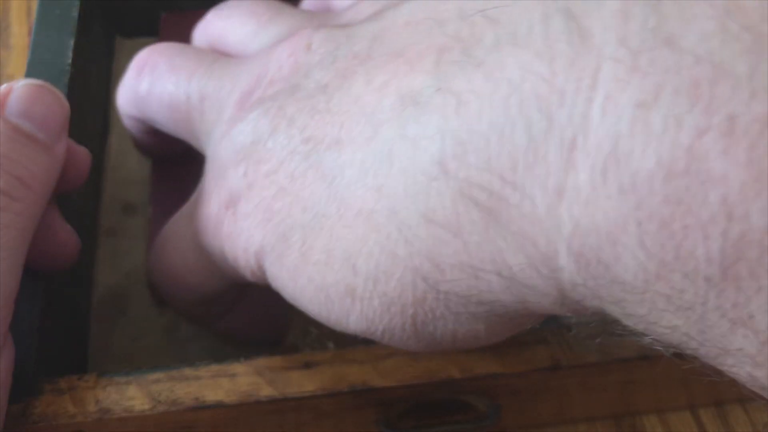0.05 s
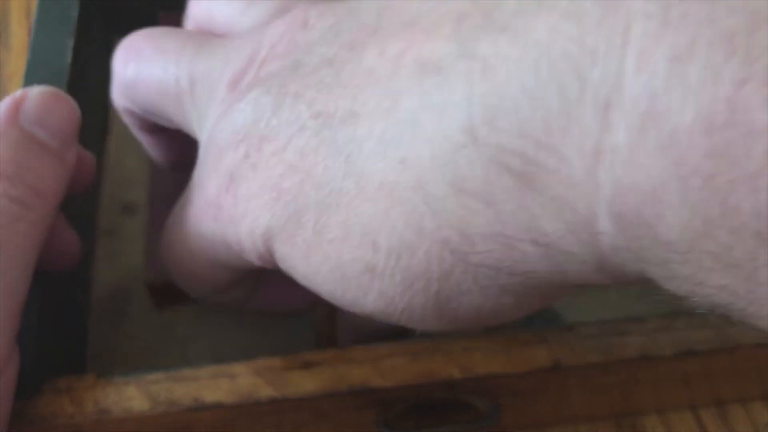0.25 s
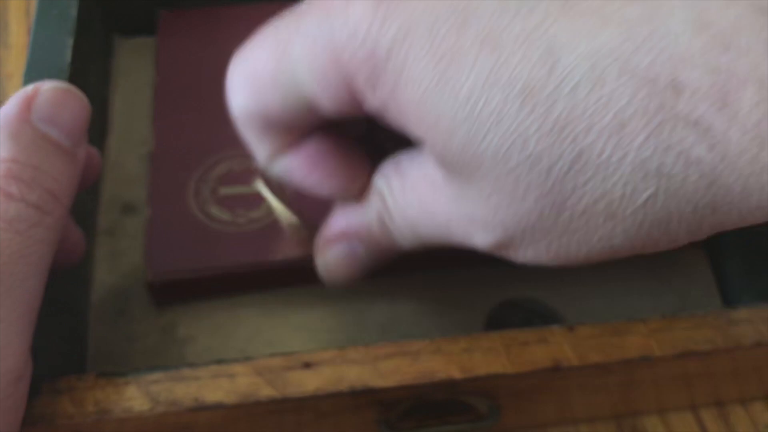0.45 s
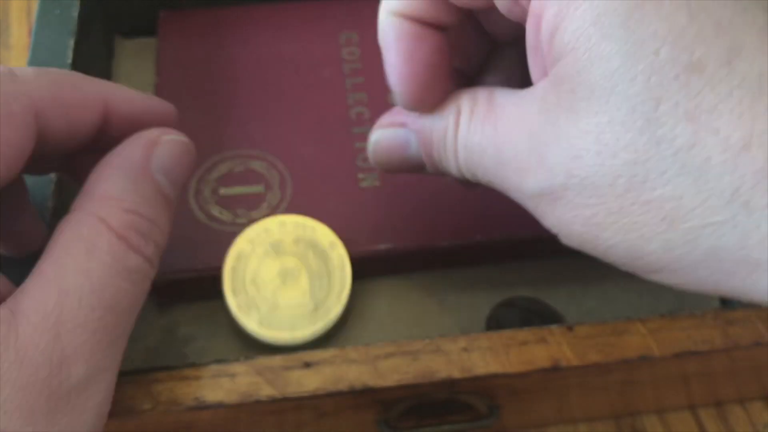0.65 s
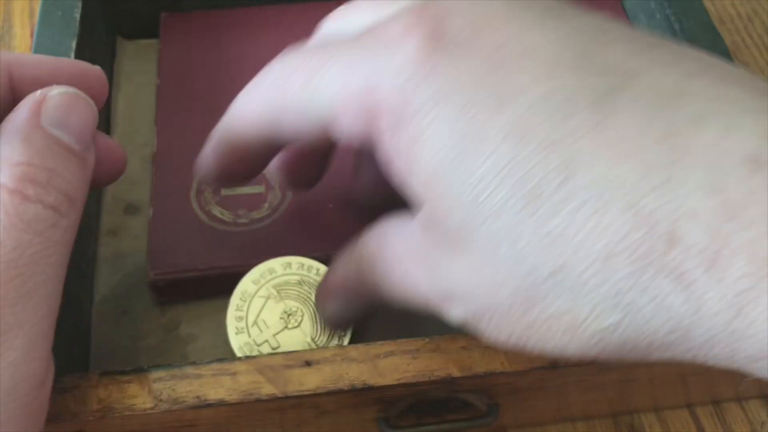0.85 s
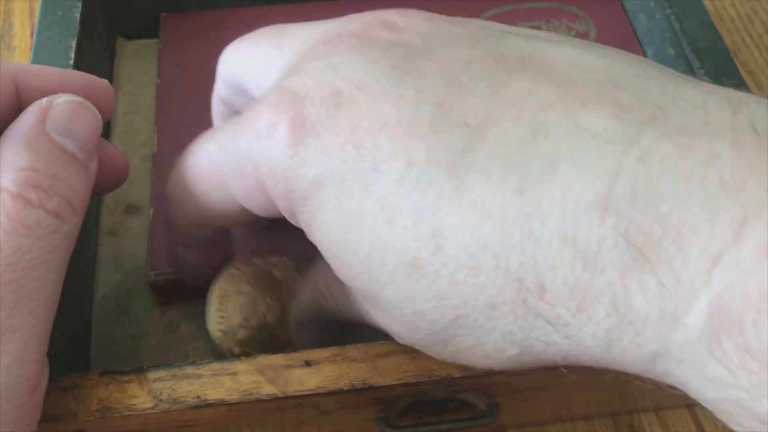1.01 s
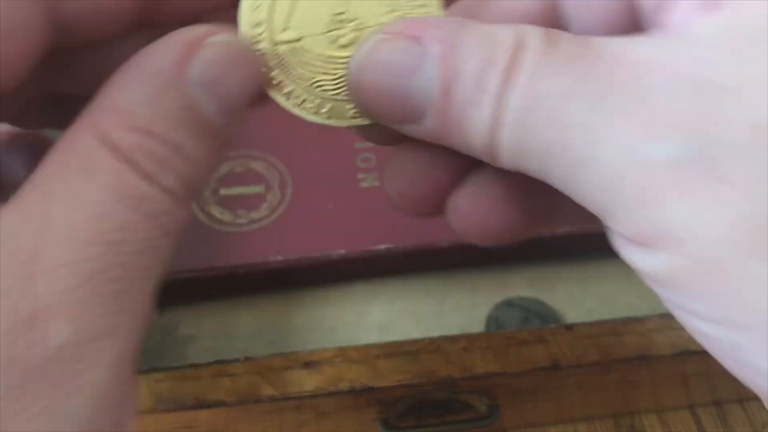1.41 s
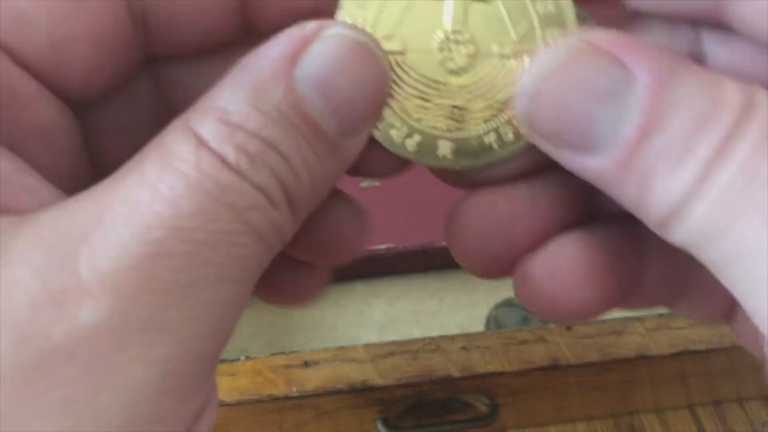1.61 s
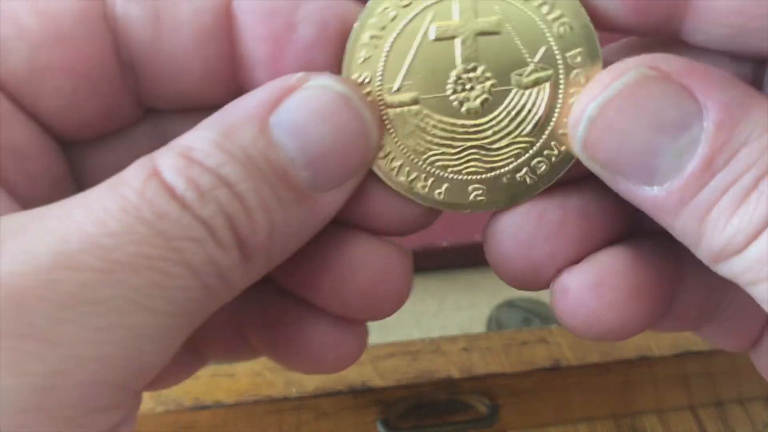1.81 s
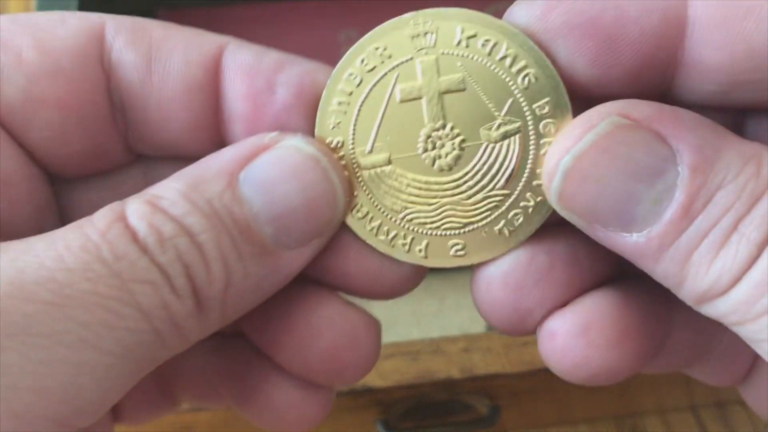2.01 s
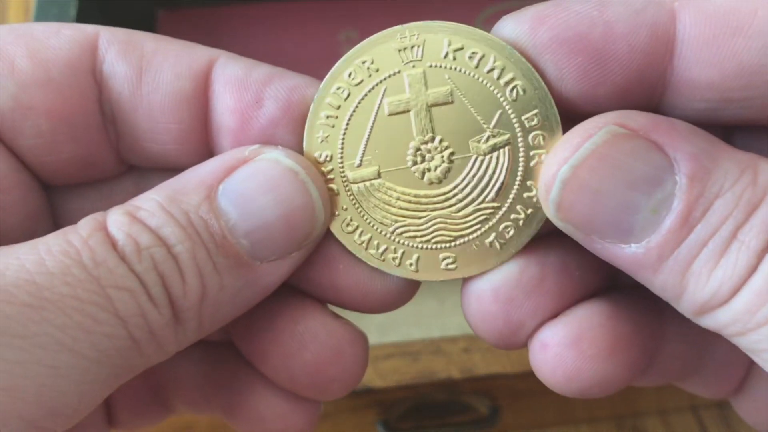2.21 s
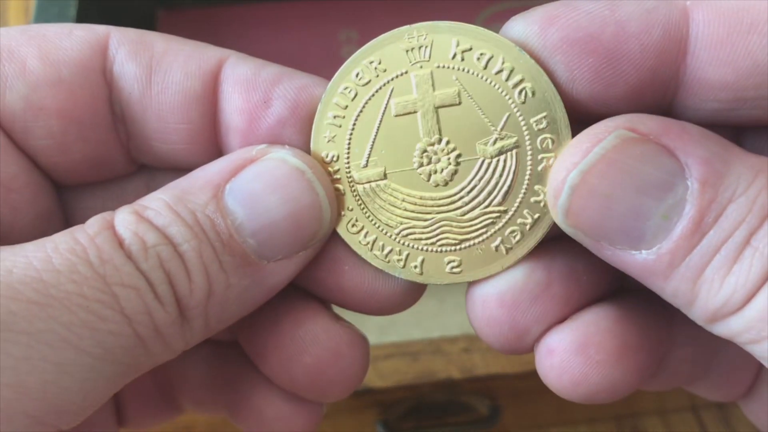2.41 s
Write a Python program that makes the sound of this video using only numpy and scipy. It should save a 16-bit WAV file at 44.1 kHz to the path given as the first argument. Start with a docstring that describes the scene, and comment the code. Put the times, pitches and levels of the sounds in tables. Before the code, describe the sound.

A large metal coin clatters in a wooden drawer. Fingers rub over card and a flat box bumps, then the coin skips, lands with a short ring and is scraped up. Heard close in a small, faintly humming room.

```python
"""Fingers fish for a large coin in a wooden drawer, in a small, fairly live room with a faint hum.
Skin rubs over card, then a flat box bumps against the wood and sets the drawer shaking.
The coin slips, skips over the box in a run of knocks and lands ringing, until the wood smothers it.
It is scraped up again and, last and very quietly, turned in the fingers."""
import sys
import numpy as np
from scipy import signal
from scipy.fft import rfft, irfft
from scipy.io import wavfile
from scipy.ndimage import uniform_filter1d

SR = 44100
rng = np.random.default_rng(int(sys.argv[2]) if len(sys.argv) > 2 else 0)


def store_wav(level_fs):
    """Save 16-bit WAV to argv[1]."""
    pcm = np.round(np.clip(np.atleast_2d(level_fs), -1, 1) * 32767)
    wavfile.write(sys.argv[1], SR, pcm.T.astype(np.int16))


N = 112454


def amp(db):
    """Decibels to gain."""
    return 10 ** (np.asarray(db) / 20)


def unit(x):
    """Scales to rms 1."""
    return x / np.sqrt(np.mean(x ** 2) + 1e-20)


def curve_at(points, hz):
    """Reads a curve on a log-frequency axis."""
    points_hz, values = np.transpose(points)
    return np.interp(np.log(hz + 1), np.log(points_hz + 1), values)


def add(mix, start_s, sound):
    """Drops a sound into the mix at its cue."""
    part = mix[max(round(start_s * SR), 0):][:len(sound)]
    part += sound[:len(part)]


def coloured(x, eq):
    """Shapes a steady signal with an EQ curve, at rms 1."""
    gains = amp(curve_at(eq, np.fft.rfftfreq(len(x), 1 / SR)))
    return unit(irfft(rfft(x) * gains, len(x)))


def wander(samples):
    """Smooth random modulation at rms 1; more samples make it slower."""
    return unit(uniform_filter1d(uniform_filter1d(rng.standard_normal(N), samples), samples))


def swells(strokes):
    """A bell-shaped fade in and out for each stroke."""
    t = np.arange(N) / SR
    return sum(amp(db) * np.exp(-((t - peak_s) / width_s) ** 2 / 2) for peak_s, width_s, db in strokes)


def friction(eq, spread_db, slips_per_s=2500):
    """Dense tiny slips of uneven size; more spread gives more grit."""
    boost_db = spread_db * np.minimum(rng.exponential(1, N), 4)
    sizes = amp(boost_db) * rng.standard_normal(N)
    return coloured(sizes * (rng.random(N) < slips_per_s / SR), eq)


# reverb time of the room: freq_hz, t60_s
ROOM_DECAY = [(100, 0.99), (400, 0.72), (900, 0.446), (2000, 0.47), (5000, 0.37), (9000, 0.38),
              (15000, .38)]

def room(x, wet_db, build_s=0.002):
    """Direct sound plus a diffuse tail, new for each place that sounds."""
    size = 32768
    hz, t, noise = signal.stft(rng.standard_normal(size), SR, nperseg=256)
    decay = amp(-60 * t / curve_at(ROOM_DECAY, hz)[:, None])
    tail = signal.istft(noise * decay, SR, nperseg=256)[1][:size]
    tail *= 1 - np.exp(-np.arange(size) / SR / build_s)
    response = amp(wet_db) * tail / np.linalg.norm(tail)
    response[0] += 1
    return signal.fftconvolve(x, response)[:N]


# tone of the room air: freq_hz, gain_db
AIR_EQ = [(5, 17), (11, 25.5), (20, 17.5), (35, -9.5), (60, -6.5), (140, -14), (300, -13), (500, -15.5),
          (1000, -23.5), (2000, -33), (4000, -39.5), (9000, -42.5), (16000, -48.5)]
# partials of the hum: pitch_hz, rms_db
HUM_PARTIALS = [(177.6, -68), (236.9, -76), (312.2, -73.5), (355.3, -75.5)]

def room_tone(air_db=-48):
    """The bed: room air, deep rumble and a slightly wavering hum."""
    t = np.arange(N) / SR
    bed = amp(air_db) * coloured(rng.standard_normal(N), AIR_EQ)
    for hz, db in HUM_PARTIALS:
        waver = 0.33 * wander(samples=6000)
        bed += amp(db) * np.sqrt(2) * np.sin(2 * np.pi * (hz * t + rng.random()) + waver)
    return bed


# low modes of the furniture: pitch_hz, level_db, attack_s, hold_until_s, t60_s
SHAKE_MODES = [(22.3, -28.5, 0.014, 0.18, 0.5), (39, -46, 0.016, 0.15, 0.16), (55.65, -35, .03, 0.12, 0.45),
               (82.66, -27.5, 0.023, 0.023, .15), (103.1, -35, 0.025, 0.029, 0.13),
               (267.5, -48, 0.035, 0.0394, 0.49)]

def drawer_shake(start_s=0.229):
    """The low end: the bumped furniture sways and booms for a moment."""
    boom, t = np.zeros(N), np.maximum(np.arange(N) / SR - start_s, 0)
    for hz, db, attack_s, hold_until_s, t60_s in SHAKE_MODES:
        envelope = np.minimum(t / attack_s, 1) * amp(db - 60 * np.maximum(t - hold_until_s, 0) / t60_s)
        boom += envelope * np.sin(2 * np.pi * hz * t)
    return boom


# finger strokes: peak_s, half_width_s, level_db
SKIN_RUBS = [(0.067, 0.39, -65), (1.514, 0.084, -78), (1.68, 0.046, -79.5), (2.17, 0.024, -99)]
RIM_DRAGS = [(2.155, .022, -78)]
HAND_PUSHES = [(0.20, 0.025, -45.5), (0.32, 0.042, -48), (0.76, 0.051, -50), (1.11, 0.062, -57.5)]
# tone of each kind of stroke: freq_hz, gain_db
RUB_EQ = [(100, 2.5), (900, 7), (1700, 4), (3000, -4), (5100, 0.5), (6500, -3.5), (9500, -3.5),
          (12000, -12.5), (16000, -16)]
DRAG_EQ = [(100, -16), (2100, -24), (2700, 9), (3300, -3), (4200, -30), (16000, -30)]
PUSH_EQ = [(20, 2.5), (55, -3), (90, 3.5), (150, -20.5), (250, -8.5), (400, -12.5), (700, -25), (2000, -49),
           (16000, -75.5)]

def fingers():
    """Skin slides over card and metal and drags on the coin's rim; the hand pushes dully on the wood."""
    rubs = swells(SKIN_RUBS) * friction(RUB_EQ, spread_db=3)
    drags = swells(RIM_DRAGS) * friction(DRAG_EQ, spread_db=5)
    skin = room(rubs + drags, wet_db=-2.5)
    return skin + swells(HAND_PUSHES) * coloured(rng.standard_normal(N), PUSH_EQ)


def ring(modes, t):
    """Struck modes ring out as dying sines."""
    return sum(amp(db - 60 * t / t60_s) * np.sin(2 * np.pi * hz * t) for hz, db, t60_s in modes)


# tone of the bright tick on each hit: freq_hz, gain_db
TICK_EQ = [(100, -25.5), (2000, -10.5), (4000, 8), (6200, 7.5), (8000, 0), (9300, 2), (11000, -8.5),
           (14000, -3), (16000, -15.5)]

def impacts(hits, modes, clack_eq, body_attack_s, snap_s, body_wet_db, clack_wet_db, tick_wet_db):
    """Three layers to a hit: the ringing body, and a clack and a bright tick from the contact."""
    bodies, clacks, ticks = np.zeros((3, N))
    t = np.arange(8192) / SR
    body = ring(modes, t) * (1 - np.exp(-t / body_attack_s))
    for start_s, body_db, clack_db, tick_db, contact_decay_s in hits:
        clack_noise, tick_noise = rng.standard_normal((2, len(t)))
        contact = 2 * np.exp(-t / contact_decay_s) * (1 - np.exp(-t / snap_s))
        add(bodies, start_s, amp(body_db) * body)
        add(clacks, start_s, amp(clack_db) * contact * coloured(clack_noise, clack_eq))
        add(ticks, start_s, amp(tick_db) * contact * coloured(tick_noise, TICK_EQ))
    return room(bodies, body_wet_db) + room(clacks, clack_wet_db) + room(ticks, tick_wet_db)


# box hits: start_s, body_db, clack_db, tick_db, contact_decay_s
BOX_HITS = [(0.187, -48.5, -57.5, -64, .005), (0.195, -47, -52, -61.5, 0.0074),
            (0.224, -29, -38, -68, 0.006), (0.229, -24, -33.5, -45.5, 0.0059),
            (0.234, -47.5, -29, -45.5, 0.0045), (0.246, -42.5, -36.5, -57, 0.0026),
            (0.259, -37.5, -36.5, -67.5, .003), (0.274, -38, -34.5, -55.5, 0.002),
            (0.283, -37, -27.5, -50.5, 0.0036), (0.296, -44, -43.5, -56, 0.0048)]
# resonances of the box: pitch_hz, gain_db, t60_s
BOX_MODES = [(535, -9, .07), (684, -13, .07), (840, -16, .05), (960, -7, .03), (1037, 0, .05),
             (1366, -1, .055), (1580, -9, .04), (1787, -7, .06), (2000, -9, .04), (2227, -7, .05),
             (2300, -10, .05), (3420, -13, .03)]
# tone of its clack: freq_hz, gain_db
BOX_CLACK_EQ = [(100, -24), (250, -8), (450, -11), (900, 1), (1600, 0.5), (2150, 1), (2650, -9), (3400, -6),
                (4600, -19.5), (7000, -32), (16000, -45.5)]

def box_bumps():
    """The flat box clatters against the drawer, each bump ringing its short, hollow modes."""
    return impacts(BOX_HITS, BOX_MODES, BOX_CLACK_EQ, body_attack_s=0.0025, snap_s=0.0011,
                   body_wet_db=-13.5, clack_wet_db=-1.5, tick_wet_db=-3)


# scraping strokes: peak_s, rise_s, fall_s, level_db, metal_send_db
SCRAPE_STROKES = [(0.404, 0.018, 0.0073, -53.5, -24), (1.035, 0.017, 0.022, -74.5, -6),
                  (1.094, 0.016, 0.0071, -65.5, -8), (1.167, 0.012, 0.01, -60, -12)]
# tone of the scrape: freq_hz, gain_db
SCRAPE_EQ = [(100, -19), (900, 1.5), (2000, -0.5), (4200, -9.5), (5800, 2), (7300, -7), (9200, -5),
             (10800, -12), (14000, -13), (16000, -26)]
# resonances of the held coin: pitch_hz, gain_db, t60_s
HELD_COIN_MODES = [(5340, 0.5, 0.056), (9000, 0, 0.034), (12100, 7, .07)]

def coin_scrapes():
    """The rim drags over the drawer floor; the slips make the held coin ring faintly."""
    scrapes, t = np.zeros(N), np.arange(N) / SR
    slips = friction(SCRAPE_EQ, spread_db=4)
    metal = unit(signal.fftconvolve(slips, ring(HELD_COIN_MODES, t[:SR // 10]))[:N])
    for peak_s, rise_s, fall_s, db, metal_send_db in SCRAPE_STROKES:
        width_s = np.where(t < peak_s, rise_s, fall_s)
        scrapes += swells([(peak_s, width_s, db)]) * (slips + amp(metal_send_db) * metal)
    return room(scrapes, wet_db=1.5)


# coin hits: start_s, body_db, clack_db, tick_db, contact_decay_s
COIN_HITS = [(0.409, -27, -46.5, -82, 0.0032), (0.444, -32, -50, -66, 0.001),
             (0.495, -31, -46, -56, 0.0024), (0.563, -32, -48, -58, 0.0031), (0.587, -33, -31, -45, 0.0027),
             (0.597, -46.5, -37.5, -70, 0.0022), (0.636, -33, -42.5, -59, 0.0024),
             (0.693, -41.5, -45, -52, .004), (0.699, -19, -35, -44.5, 0.0019),
             (0.737, -35, -47, -71, 0.0076), (1.094, -52, -67, -80, .006), (1.175, -47, -62.5, -64, 0.0055),
             (1.583, -81, -67.5, -81, .002), (1.668, -79.5, -72, -81, .002), (1.968, -81, -72, -69, 0.0025)]
# resonances struck by each knock, of the drawer and of the room around it: pitch_hz, gain_db, t60_s
KNOCK_MODES = [(545, -20, .06), (655, -12, .05), (682, -12, .07), (772, -15, .11), (835, -16, .15),
               (944, 0, .045), (1020, -3, .035), (1100, -7, .05), (1240, -10, .04), (1370, -14, .04),
               (1785, -18, .06)]
# tone of the coin's clack: freq_hz, gain_db
COIN_CLACK_EQ = [(100, -18), (250, -13.5), (450, -2), (1050, 1.5), (1600, 1), (2200, -2), (2700, -6.5),
                 (3500, -9.5), (4800, -13.5), (7000, -15), (16000, -48)]

def coin_knocks():
    """The coin strikes box and drawer, and the wood answers with a knock."""
    return impacts(COIN_HITS, KNOCK_MODES, COIN_CLACK_EQ, body_attack_s=0.0021, snap_s=0.00062,
                   body_wet_db=-8, clack_wet_db=3, tick_wet_db=1.5)


# resonances of the free coin, in a low, a middle and a top group: pitch_hz, gain_db, free_t60_s
COIN_MODE_GROUPS = [
    [(5335, -5, .5), (5378, 0, .7), (5407, -10, .4)],
    [(9262, -8, .06), (9284, 0, .06), (9277, -28, .25)],
    [(12192, 0, .2), (12215, -9, .12)],
]
# ring cues, with a level for each group: start_s, low_db, middle_db, top_db
RING_CUES = [(0.478, -71, -65, -82), (0.497, -68.5, -57.5, -67), (0.535, -69, -66, -78),
             (0.587, -66, -60, -64), (0.608, -84, -56.5, -67), (0.632, -63.5, -58, -60),
             (0.655, -62, -69, -76), (0.692, -61, -49, -72), (0.699, -56, -37.5, -56),
             (0.738, -53.5, -75, -64), (1.165, -77, -82, -67)]

def coin_ring(settle_s=0.115, flutter_db=3):
    """Close, high modes shimmer, flutter as the coin rocks and are smothered by the wood as it settles."""
    rings, t = np.zeros(N), np.arange(SR // 2) / SR
    smother = np.exp(-(t / settle_s) ** 2 / 2)
    groups = [ring(modes, t) * smother for modes in COIN_MODE_GROUPS]
    for start_s, *levels_db in RING_CUES:
        add(rings, start_s, sum(amp(db) * group for db, group in zip(levels_db, groups)))
    rocking = wander(samples=300)
    return room(rings * amp(flutter_db * rocking), wet_db=-4.5)


def scene():
    """All layers in one mono mix."""
    foley = box_bumps() + coin_knocks() + coin_ring() + coin_scrapes() + fingers()
    return (foley + drawer_shake() + room_tone())[None]


def record(dry, cutoff_hz=15800):
    """A steep high cut on the whole mix."""
    high_cut = signal.firwin(511, cutoff_hz, window=("kaiser", 9), fs=SR)
    return signal.oaconvolve(dry, high_cut[None], "same")


dry = scene()
out = record(dry)
store_wav(out)
```